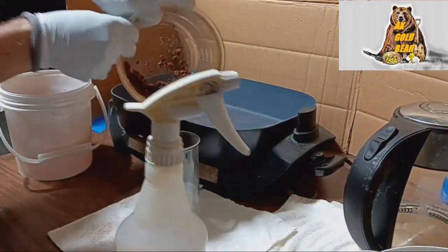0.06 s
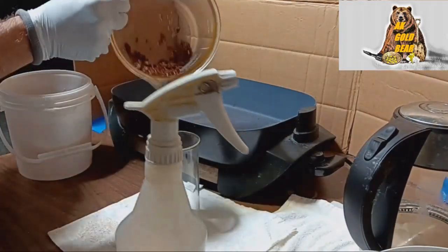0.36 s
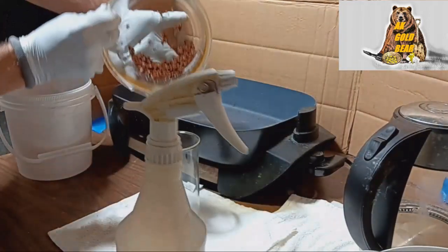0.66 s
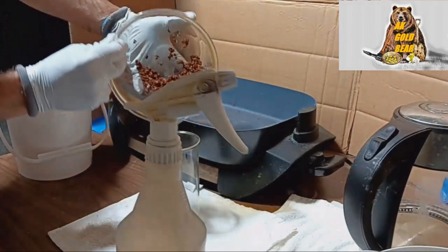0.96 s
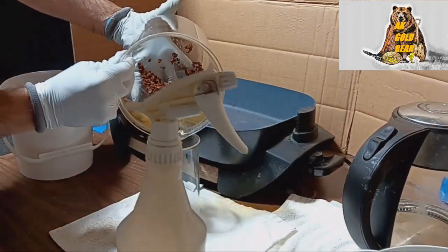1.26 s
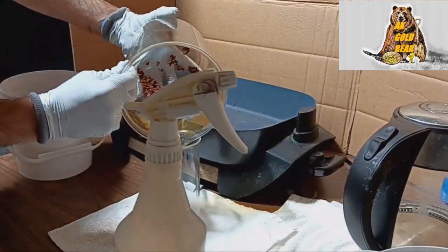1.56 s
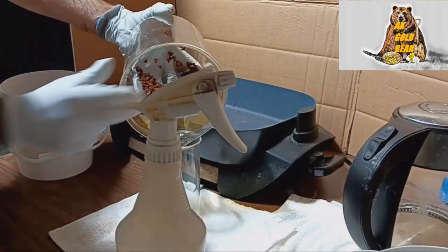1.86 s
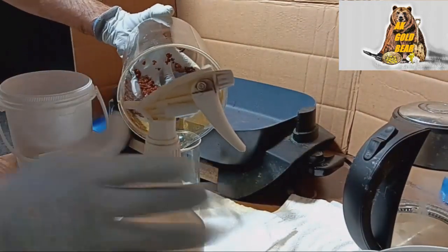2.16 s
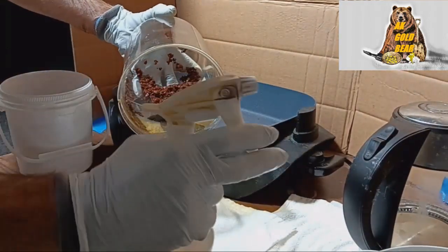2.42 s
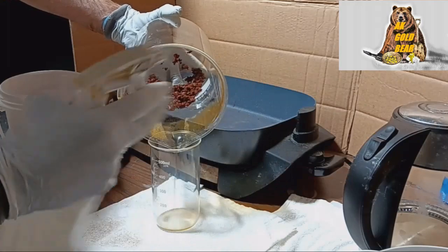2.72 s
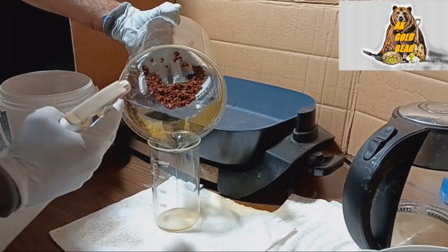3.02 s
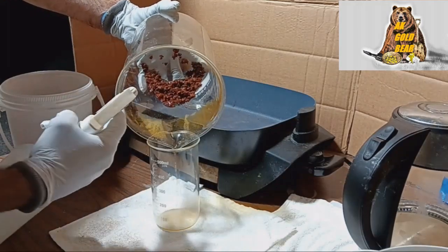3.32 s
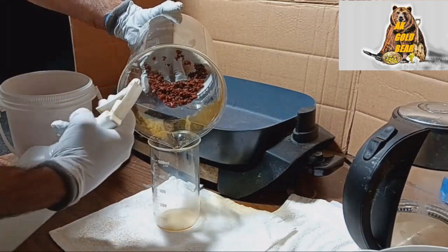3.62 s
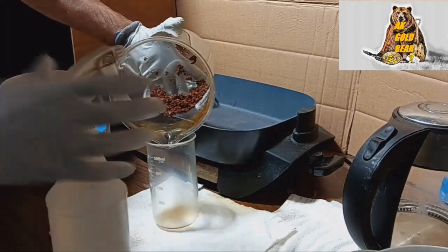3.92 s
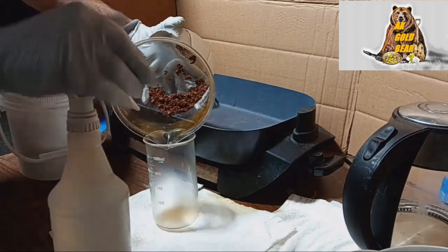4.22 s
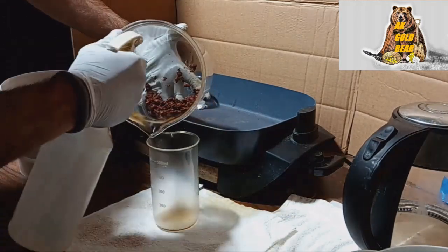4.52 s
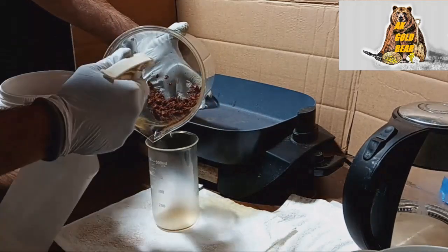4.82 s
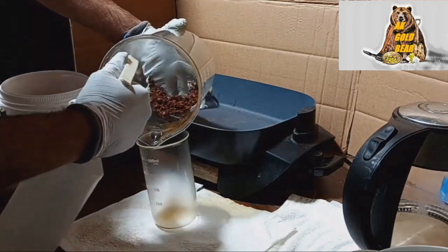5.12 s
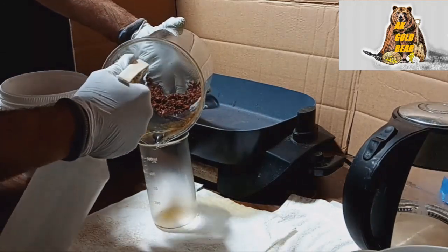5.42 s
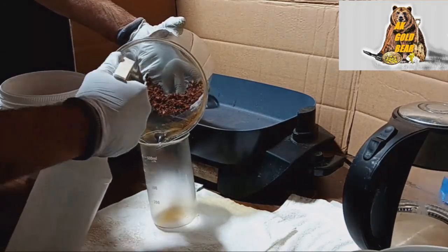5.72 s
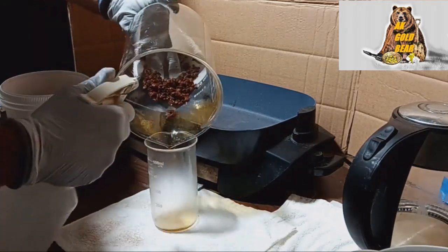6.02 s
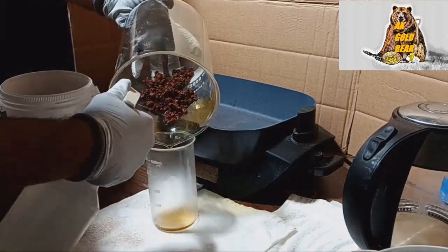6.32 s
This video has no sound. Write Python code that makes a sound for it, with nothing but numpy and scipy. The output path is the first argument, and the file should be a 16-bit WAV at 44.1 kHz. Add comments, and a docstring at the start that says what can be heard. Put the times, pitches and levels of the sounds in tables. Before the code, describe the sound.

Wind buffets the microphone as glass beakers knock and clink, metal granules tick, and a spray bottle squeaks.

```python
"""An outdoor bench, heard from close by: a glass beaker of wet metal granules is tipped over a smaller glass.
At first soft wind rumbles on the microphone over a sinking hiss; the spout knocks on the rim at 1.3 s
and granules tick against the glass. Something bumps the bench, and at 3.6 s the sound breaks off briefly.
Then come taps and clinks, and a spray bottle rinses the granules down, its plunger squeaking from 5.3 s,
while gusts buffet each microphone port on its own."""
import sys
import numpy as np
from scipy import signal
from scipy.fft import rfft, irfft, next_fast_len
from scipy.io import wavfile
from scipy.ndimage import uniform_filter1d, map_coordinates

SR = 44100
rng = np.random.default_rng(int(sys.argv[2]) if len(sys.argv) > 2 else 0)


def unload_wav(signal):
    """Save mono or channel-first audio to the path in sys.argv[1] as 16-bit WAV at rate SR, clipped to [-1, 1]."""
    wavfile.write(
        sys.argv[1],
        SR,
        np.round(np.clip(np.atleast_2d(signal).T, -1, 1) * 32767).astype(np.int16),
    )


N = 280917
TIME = np.arange(N) / SR
AGE = np.arange(SR // 2) / SR  # seconds since a short sound began
BREAK_START_S, BREAK_END_S = 3.612, 3.642
LEFT, RIGHT = 1, -1  # the microphone's two ports

# The spout bounces on the rim; the wall takes dull taps. Each row: start in seconds, relative level in dB.
SPOUT_KNOCKS = [(1.33, -10), (1.349, -7.5), (1.44, -18.5), (1.482, -21)]
WALL_TAPS = [(3.791, -22.5), (3.875, -25.5), (3.946, -42), (4.252, -24), (5.146, -38.5), (5.776, -29.5)]
# Light clinks. Each row: start in seconds, relative level in dB, top mode in dB, long note's t60 in seconds.
RIM_CLINKS = [(4.326, -19.5, -12, 0.52), (4.705, -37, -1, 0.44), (4.779, -23, -5, 0.11)]
# How the glass rings. Each row: frequency in Hz, relative level in dB, t60 in seconds.
BOTH_GLASSES_MODES = [(520.7, -10.5, 0.32), (1126, -8.5, 0.17), (2650, -7.5, .09), (4280, -5, .09),
                      (4740, -2.5, .08), (6430, -4, 0.11), (8140, -3.5, .08), (11300, -6.5, 0.042)]
WALL_MODES = [(1495, -13, 0.068), (2044, 5.5, 0.065), (2120, -5.5, 0.14), (3174, -16, 0.062)]
RIM_MODES = [(2080, -19.5, 0.14), (4500, -6.5, 0.062), (4950, -18.5, 0.057), (5780, -22, 0.045)]
# Contact noise; the bright one also serves clacks and swishes. Each row: frequency in Hz, level in dB.
KNOCK_TONE = [(200, -27), (420, 1.5), (1900, -1.5), (4600, -2), (6400, 3.5), (7300, -8), (8400, 1.5),
              (15500, -21)]
TAP_TONE = [(900, -18), (1600, -2.5), (3000, 6.5), (4000, -8), (15500, -14)]
BRIGHT_TONE = [(1000, -5), (4600, 3), (10000, 15.5), (15500, 5.5)]
def glass():
    """Close to the microphone, the beaker knocks, taps and clinks on the smaller glass and sets it ringing."""
    out = np.zeros((2, N))
    for s, db in SPOUT_KNOCKS:
        knock = strike(BOTH_GLASSES_MODES, KNOCK_TONE, crack_db=2, crack_t60=0.12, rise=0.0015, blur=0.58)
        add(out, s, amp(db - 9) * knock)
    for s, db in WALL_TAPS:
        tap = strike(WALL_MODES, TAP_TONE, crack_db=-4.5, crack_t60=0.077, rise=0.001, blur=1)
        add(out, s, amp(db - 2.5) * tap)
    for s, db, top_db, long_t60 in RIM_CLINKS:
        # a lingering contact damps the long note; a sharp one excites the top mode
        modes = RIM_MODES + [(4470, -30, long_t60), (12030, top_db, .11)]
        clink = strike(modes, BRIGHT_TONE, crack_db=-5.5, crack_t60=0.061, rise=0.0038, blur=1)
        add(out, s, amp(db - 1) * clink)
    return out


# The notes a granule can ring in the glass, in Hz.
GRANULE_NOTES = [3230, 4870, 6100, 6950, 8870, 10930]
# Granules drop. Each row: start in seconds, relative level in dB, pitch in Hz, spread in octaves.
GRANULE_TICKS = [(.122, -32.5, 9850, .7), (1.524, -32, 9400, 0.7), (1.772, -29.5, 6800, .8),
                 (1.816, -41, 11000, .15), (1.882, -35, 10600, .25), (1.998, -46, 11000, .15),
                 (2.408, -32, 6130, 0.15), (2.41, -34.5, 10100, 0.44), (3.025, -38, 4100, 1.14),
                 (3.11, -44, 9500, 0.15), (6.285, -39, 7700, 0.26)]
def granules():
    """Single granules tick on the glass; each rings the notes around its own pitch, a little out of tune."""
    out = np.zeros((2, N))
    for s, db, pitch, octaves in GRANULE_TICKS:
        notes = GRANULE_NOTES * rng.normal(1, .02, len(GRANULE_NOTES))
        weights = np.exp(-(np.log2(notes / pitch) / octaves) ** 2)
        blur = .7 + 1.8 * octaves  # a harder contact rings more notes, less purely
        ping = sum(weight * np.sin(2 * np.pi * hz * AGE + blur * wobble(850, len(AGE))[0])
                   for hz, weight in zip(notes, weights))
        tick = np.tile(unit(ping), (2, 1)) * stroke(length=0.0051, rise=0.00058, t60=0.048)
        add(out, s, amp(db - 2.5) * scattered(tick))
    return out


# Plunger strokes. Each row: start in seconds, relative level in dB, note against rasp in dB.
PLUNGER_STROKES = [(5.266, -36.5, -30), (5.341, -32, -14), (5.413, -26.5, -10), (5.485, -25.5, -7.5),
                   (5.582, -25, -4), (5.673, -29.5, -6.5)]
# The plunger's rasp. Each row: frequency in Hz, level in dB.
RASP_TONE = [(3500, -38), (4900, -16), (5600, -21.5), (9200, -13.5), (9750, 9), (10300, 4.5),
             (11000, -15.5), (15500, -14)]
def squeaks(slip_hz=4870):
    """The sprayer's plunger sticks and slips unevenly: a ragged note under a rasp at its octave."""
    out = np.zeros((2, N))
    for s, db, note_db in PLUNGER_STROKES:
        hz = slip_hz * (1 + .03 * wobble(1100, len(AGE)))
        note = amp(note_db) * np.sin(2 * np.pi * np.cumsum(hz, axis=1) / SR)
        rasp = noise(RASP_TONE, len(AGE), alike=0.4)
        grip = amp(4 * np.tanh(wobble(330, len(AGE))[0]))
        envelope = stroke(length=0.026, rise=0.0037, t60=0.044)
        add(out, s, amp(db - 3.5) * envelope * grip * (note + scattered(rasp)))
    return out


# The spray builds. Each row: time in seconds, relative level in dB.
SPRAY_LEVELS = [(4.21, -64), (4.83, -57.5), (6.37, -54.5)]
# Mist landing on the granules. Each row: frequency in Hz, level in dB.
MIST_TONE = [(3800, -15.5), (6500, -5), (11000, 1.5)]
def spray(droplets_per_s=20, crackle_db=-8):
    """After the break, mist rinses the wet heap unevenly, with a fine crackle of droplets."""
    mist = patchy(noise(MIST_TONE, alike=0.72), depth_db=2)
    droplets = rng.random(N) ** 2 * (rng.random(N) < droplets_per_s / SR)
    crackle = amp(crackle_db) * unit(signal.fftconvolve(droplets, fade(.008))[:N])
    level_db = curve(SPRAY_LEVELS) + 5.5 + 1.34 * np.tanh(wobble(25)[0])
    return amp(level_db) * mist * (1 + crackle) * (TIME > BREAK_END_S)


# The bottle clacks. Each row: start in seconds, relative level in dB.
BOTTLE_CLACKS = [(3.768, -29.5), (3.84, -25)]
# How its trigger rings. Each row: frequency in Hz, relative level in dB, t60 in seconds.
TRIGGER_MODES = [(3340, -4, 0.06), (10800, -10, .04)]
def clacks():
    """The spray bottle's plastic trigger clacks and rings briefly."""
    out = np.zeros((2, N))
    for s, db in BOTTLE_CLACKS:
        clack = strike(TRIGGER_MODES, BRIGHT_TONE, crack_db=-3, crack_t60=0.06, rise=0.0008, blur=0.18)
        add(out, s, amp(db - 9.5) * clack)
    return out


# Brief rubbing. Each row: start in seconds, relative level in dB, length in seconds.
GLOVE_SWISHES = [(0.101, -41.5, 0.052), (2.197, -53.5, 0.1), (3.639, -43.5, 0.029)]
def swishes():
    """Gloves and wet granules swish; the longer the swish, the more gently it swells and runs out."""
    out = np.zeros((2, N))
    for s, db, length in GLOVE_SWISHES:
        envelope = stroke(length, rise=length / 2, t60=3 * length)
        flicker = amp(4.3 * wobble(160, len(AGE)))
        add(out, s, amp(db) * envelope * flicker * noise(BRIGHT_TONE, len(AGE)))
    return out


# Bumps. Each row: start in seconds, relative level in dB, pitch in Hz, t60 in seconds, rattle in dB.
BENCH_BUMPS = [(3.025, -32.5, 62.6, 0.4, -17), (3.078, -30, 140.5, 0.17, -21),
               (3.861, -13, 284, 0.062, -12), (3.877, -23, 534, 0.063, -4.5)]
# Their rattle. Each row: multiple of the bump's pitch, level in dB.
RATTLE_TONE = [(1, 7), (4, 4.5), (22, -4), (60, -95)]
def bumps():
    """Things bump the bench: a thud, a hollow note and a rattle die away together."""
    out = np.zeros((2, N))
    for s, db, hz, t60, rattle_db in BENCH_BUMPS:
        thud = noise([(hz / 6, -35), (hz, 0), (hz * 2, -16), (hz * 16, -100)], len(AGE), alike=0.89)
        hollow = np.sin(2 * np.pi * hz * AGE + rng.uniform(0, np.pi, (2, 1)))
        rattle = amp(rattle_db) * noise([(hz * k, level) for k, level in RATTLE_TONE], len(AGE))
        envelope = (1 - np.exp(-AGE / 0.0041)) * fade(t60)
        add(out, s, amp(db) * envelope * (thud + hollow + rattle))
    return out


# Eddies slap the microphone. Each row: time in seconds, relative level in dB, port struck.
PORT_EDDIES = [(3.705, -17.5, LEFT), (4.226, -15.5, LEFT), (4.381, -9, LEFT), (4.427, -9.5, RIGHT),
               (4.722, -9.5, LEFT), (4.757, -9, LEFT), (4.836, -14, LEFT), (5.187, -12.5, LEFT),
               (5.321, -11, RIGHT), (5.401, -8.5, LEFT), (5.424, -2.5, RIGHT), (5.435, -7.5, RIGHT),
               (5.456, -10, RIGHT), (5.633, -4.5, LEFT), (5.682, -1, LEFT), (5.695, -15, LEFT),
               (5.740, -4, LEFT), (5.751, -11.5, LEFT), (5.798, -11, RIGHT), (5.905, -7, LEFT),
               (5.94, -14, LEFT)]
PORT_LEAD_DB = 29.5  # the struck port over the other
def eddies(gusts, small_per_s=60):
    """Eddies pass a port as pressure spikes; small ones come at random, scaled by the gusts."""
    lead = SR // 100
    t = np.arange(-lead, lead) / SR

    def spike(width_s):
        """One peak between two shallow dips."""
        return (1 - 3 * (t / width_s) ** 2) / (1 + (t / width_s) ** 2) ** 3

    strength = amp(14) * gusts * rng.uniform(-0.83, 1, (2, N))
    slaps = strength * (rng.random((2, N)) < small_per_s / SR)
    out = signal.oaconvolve(slaps, [spike(0.0011)], mode="same", axes=1)
    for s, db, port in PORT_EDDIES:
        width_s = 0.00068 / amp(db) ** 0.29  # the stronger, the sharper
        add(out, s - lead / SR, amp(db - 2) * panned(port * PORT_LEAD_DB) * spike(width_s))
    return out


# Gusts. Each row: start in seconds, length in seconds, relative level in dB, left over right in dB.
PORT_GUSTS = [(3.66, 0.052, -39, 38), (3.74, 0.27, -46, 0.5), (4.15, 0.064, -34, 20),
              (4.25, 0.3, -39.5, 10), (4.365, 0.27, -29.5, 9), (4.7, .13, -28.5, 1),
              (4.84, 0.13, -40.5, 7.5), (5.11, 0.023, -37, 25), (5.183, 0.019, -21.5, 23),
              (5.235, 0.029, -36, -14), (5.29, 0.067, -37.5, 8), (5.355, 0.093, -24, 2.5),
              (5.47, 0.58, -30.5, 4), (5.63, 0.092, -25, 12), (6.15, .21, -39.5, 22),
              (6.285, 0.034, -34, 15)]
# Their body and brighter edge. Each row: frequency in Hz, level in dB.
GUST_TONE = [(35, -18), (160, -2.5), (290, 0.5), (520, -10.5), (1700, -75)]
GUST_EDGE_TONE = [(250, -35), (600, 0.5), (1100, -9.5), (1600, -21.5), (3200, -52)]
def buffeting(low_cut_hz=77):
    """After the break each port has its own turbulence; the harder the flow, the brighter its edge."""
    gusts = wind_flow(PORT_GUSTS, attack=0.0012, release=0.011) * amp(2.07 * np.tanh(wobble(32)))
    # rough air surrounds each eddy and arrives just ahead of it
    swirl_rows = [(s - 0.0036, 0.013 * amp(db), db - 15, port * PORT_LEAD_DB)
                  for s, db, port in PORT_EDDIES]
    swirls = wind_flow(swirl_rows, attack=0.00051, release=0.027)
    lull = amp(-50) * panned(14)  # the air never quite rests, and favours the left port
    flow = np.sqrt(gusts ** 2 + swirls ** 2 + lull ** 2) * amp(6.5 * np.tanh(wobble(90)) - 2)
    edge = np.minimum(flow / amp(-21), 1) ** 1.94 * amp(-8.5 + 7.3 * np.tanh(wobble(160)))
    pressure = flow * (noise(GUST_TONE) + edge * noise(GUST_EDGE_TONE)) + eddies(gusts)
    low_cut = signal.butter(2, low_cut_hz, "highpass", fs=SR, output="sos")
    return signal.sosfilt(low_cut, pressure) * (TIME > BREAK_END_S)


# Early puffs. Each row: start in seconds, length in seconds, relative level in dB, left over right in dB.
BREEZE_PUFFS = [(0, 0.24, -24, 2.5), (.28, 0.072, -24, 6), (.452, 0.051, -27, 46), (.7, .065, -42.5, 35),
                (.94, 0.091, -32, -33), (1.03, 0.545, -28.5, -49), (1.65, .05, -41, 33),
                (2.235, .1, -42.5, -1)]
# Their rumble. Each row: frequency in Hz, level in dB.
BREEZE_TONE = [(15, -11.5), (48, 12.5), (95, 10), (190, -17.5), (380, -91.5)]
def breeze():
    """Soft, deep puffs of wind right on the microphone; the strong ones reach a little higher."""
    flow = wind_flow(BREEZE_PUFFS, attack=0.014, release=0.034, sag_db_per_s=52.5)
    edge = flow / amp(-17) * noise([(60, 25), (170, 37.5), (380, 3), (900, -62)])
    flutter = amp(0.87 * np.tanh(wobble(46.45)))
    return flow * flutter * (noise(BREEZE_TONE) + edge)


# The hiss behind the bench. Each row: time in seconds, level in dB.
HISS_LEVELS = [(0.0, -44), (3.6, -52.5)]
# The colours of the hiss and the high air. Each row: frequency in Hz, level in dB.
HISS_TONE = [(30, 9), (300, -9), (1100, -12), (3050, -1), (3380, 8.5), (3650, -.5), (8600, 3.5),
             (10000, -2), (11400, -23), (14500, -35)]
AIR_TONE = [(3000, -8.5), (11900, -20), (13100, 8.5), (13750, 7.5), (14400, -5)]
def background():
    """A slowly sinking hiss before the break, thin high air after it."""
    hiss = amp(curve(HISS_LEVELS)) * noise(HISS_TONE, alike=0.15)
    air = amp(-58 + 2.2 * np.tanh(wobble(26))) * patchy(noise(AIR_TONE), depth_db=1.5)
    return hiss * (TIME < BREAK_START_S) + air * (TIME > BREAK_END_S)


def strike(modes, tone, crack_db, crack_t60, rise, blur):
    """Ringing modes plus a crack that the clutter on the bench scatters."""
    ring = np.zeros((2, len(AGE)))
    for hz, db, t60 in modes:
        phase = rng.uniform(0, 2 * np.pi) + rng.normal(0, 0.82, (2, 1)) + blur * wobble(152, len(AGE))
        strength = amp(db + rng.normal(0, 2, (2, 1)))
        ring += strength * fade(t60) * np.sin(2 * np.pi * hz * AGE + phase)
    ring /= np.sqrt(sum(amp(db) ** 2 for _, db, _ in modes) / 2)
    crack = amp(crack_db) * scattered(fade(crack_t60) * noise(tone, len(AGE), alike=0.09))
    return (ring + crack) * (1 - np.exp(-AGE / rise))


def scattered(x, count=4):
    """Nearby glass and bench return quick copies, different on each side."""
    out = x.copy()
    for channel in range(2):
        for delay in rng.integers(SR // 4000, SR // 250, count):
            out[channel, delay:] += rng.choice([-1, 1]) * .5 * x[channel, :-delay]
    return out / np.sqrt(1 + count / 4)


def wind_flow(gusts, attack, release, sag_db_per_s=0):
    """Air speed at the two ports: each gust rises, holds or sags for its length, and dies away."""
    power = np.zeros((2, N))
    for s, length, db, side_db in gusts:
        age = np.maximum(TIME - s, 0)
        shape = (1 - np.exp(-age / attack)) * np.exp(-np.maximum(age - length, 0) / release)
        power += (amp(db - sag_db_per_s * age) * shape * panned(side_db)) ** 2
    return np.sqrt(power)


def noise(tone, size=N, alike=0):
    """Coloured stereo noise of rms 1; alike is the share common to both sides."""
    m = next_fast_len(size)
    hz, db = np.transpose(tone)
    gain = amp(np.interp(np.log(np.fft.rfftfreq(m, 1 / SR) + 1), np.log(hz), db))
    gain[0] = 0
    white = rng.standard_normal((3, m))
    pair = np.sqrt(1 - alike) * white[:2] + np.sqrt(alike) * white[2]
    return unit(irfft(rfft(pair) * gain, m)[:, :size])


def patchy(x, depth_db):
    """Let the colour of a hiss drift in random patches; rms 1."""
    spectrum = signal.stft(x)[2]
    speckle = rng.standard_normal(spectrum.shape[1:])
    patches = unit(uniform_filter1d(uniform_filter1d(speckle, 7, axis=0), 12, axis=1))
    return unit(signal.istft(spectrum * amp(depth_db * patches))[1][:, :N])


def wobble(rate, size=N):
    """A smooth random curve for each channel, rate knots a second."""
    at = np.arange(size) * rate / SR
    return np.array([map_coordinates(rng.standard_normal(int(at[-1]) + 4), [at]) for _ in range(2)])


def curve(rows):
    """Join (seconds, value) points, one value per sample."""
    return np.interp(TIME, *np.transpose(rows))


def fade(t60):
    """Exponential decay, 60 dB down after t60 seconds."""
    return np.exp(-np.log(1000) * AGE / max(t60, 1e-3))


def stroke(length, rise, t60):
    """Swell, hold for a length, then die away."""
    return (1 - np.exp(-AGE / rise)) * np.exp(-np.log(1000) * np.maximum(AGE - length, 0) / t60)


def panned(db):
    """Left and right gains of constant power for a level difference."""
    left = 1 / (1 + amp(-np.atleast_1d(db)) ** 2)
    return np.sqrt(2 * np.array([left, 1 - left]))


def amp(db):
    """Decibels to gain."""
    return 10 ** (np.asarray(db) / 20)


def unit(x):
    """Scale to rms 1."""
    return x / np.sqrt(np.mean(x ** 2) + 1e-20)


def add(out, s, sound):
    """Mix a sound in at s seconds."""
    start = max(round(s * SR), 0)
    out[:, start:start + sound.shape[1]] += sound[:, :N - start]


def scene():
    """Everything at the bench, from a stereo microphone close by in the wind."""
    wind = breeze() + buffeting()
    bench = glass() + squeaks() + granules() + clacks() + swishes() + bumps()
    return wind + bench + background() + spray()


def record(dry):
    """The recorder rounds off the tallest peaks and keeps nothing above its band limit."""
    ceiling, top_hz = .95, 15950
    rounded = dry / (1 + (np.abs(dry) / ceiling) ** 6) ** (1 / 6)
    m = next_fast_len(N + SR // 2)
    passband = 1 / (1 + (np.fft.rfftfreq(m, 1 / SR) / top_hz) ** 160)
    return irfft(rfft(rounded, m) * passband, m)[:, :N]


dry = scene()
out = record(dry)
unload_wav(out)
```